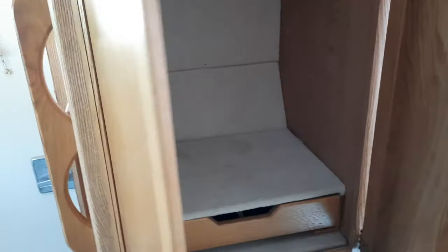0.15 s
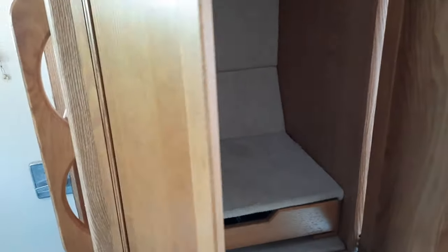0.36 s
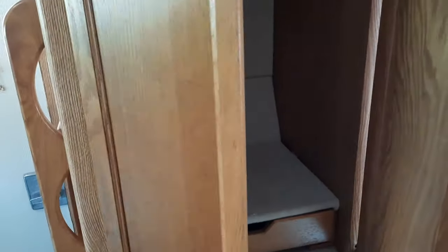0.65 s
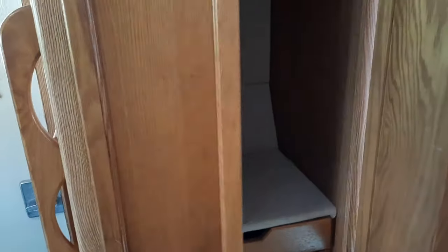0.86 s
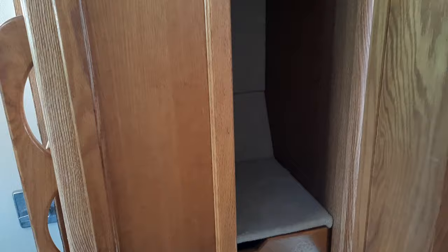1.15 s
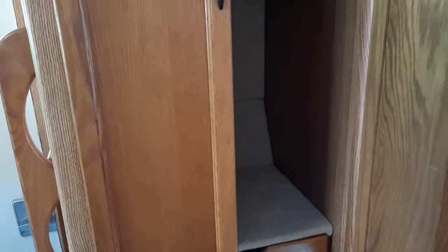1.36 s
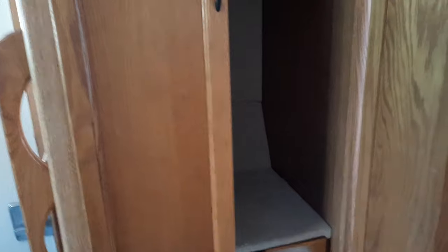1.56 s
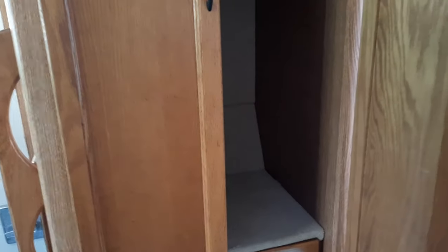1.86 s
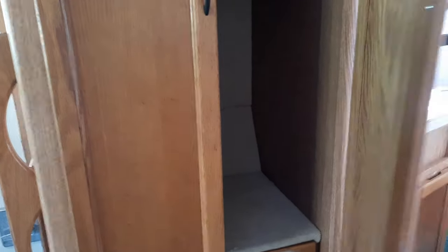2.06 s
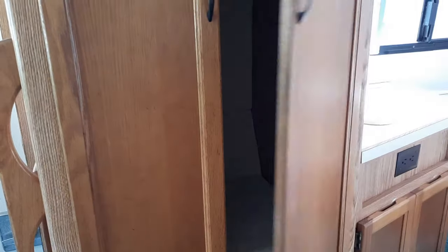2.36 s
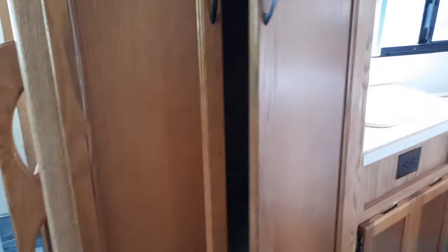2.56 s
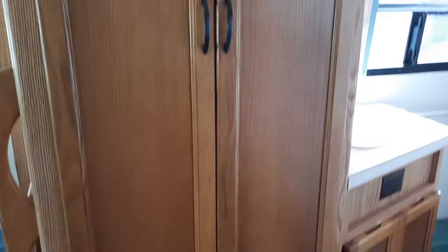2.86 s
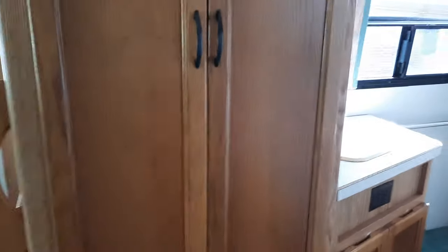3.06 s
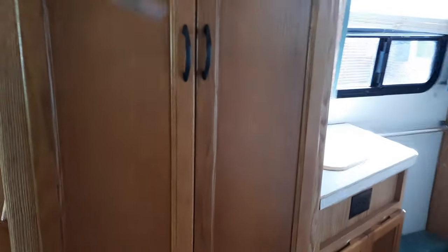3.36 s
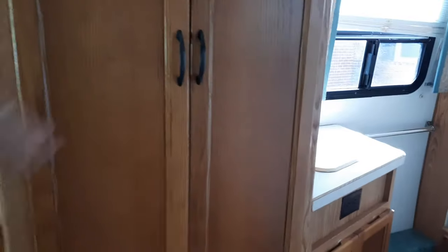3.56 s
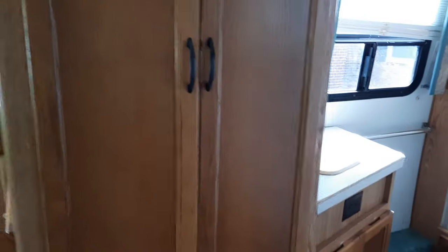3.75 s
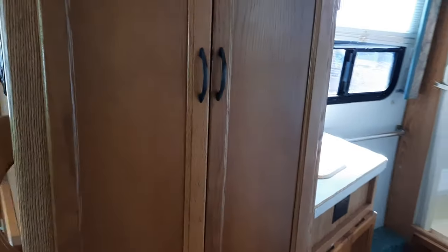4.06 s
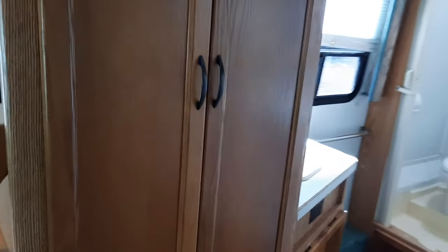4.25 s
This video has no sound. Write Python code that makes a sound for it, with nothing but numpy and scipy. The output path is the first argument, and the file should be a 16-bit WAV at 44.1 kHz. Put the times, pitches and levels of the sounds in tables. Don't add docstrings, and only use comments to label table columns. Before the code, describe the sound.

Close hand-held microphone, dry small vehicle interior. The left cupboard door closes near one second, bouncing on its catch as a loose wooden clatter with hollow boom. About two seconds later the right door rubs its edge, then lands flat with one sharp crack and short boomy bounces. Faint scuffs, ticks, dull bumps, low cabin rumble and thin hiss lie underneath.

```python
import sys
import numpy as np
from scipy import signal
from scipy.fft import rfft, irfft
from scipy.io import wavfile
from scipy.ndimage import uniform_filter1d

SR = 44100
rng = np.random.default_rng(int(sys.argv[2]) if len(sys.argv) > 2 else 0)


def to_linear_factor(level_db):
    exponent = np.asarray(level_db, float) / 20
    return 10 ** exponent


def log_audio(samples):
    frames = np.atleast_2d(samples).T
    limited = np.clip(frames, -1, 1)
    pcm = np.round(limited * 32767).astype(np.int16)
    wavfile.write(sys.argv[1], SR, pcm)


N = 194511

# [t/s, catch click level/dB, wood knock level/dB, panel boom level/dB]
LEFT_CONTACTS = [(0.9001, -27.5, -31, -26.5), (0.9040, -25.5, -31, -24), (0.9075, -26.5, -25, -27),
                 (0.9175, -12.5, -25, -19), (0.9241, -18.5, -16, -23), (0.9310, -20.5, -22.5, -20.5),
                 (0.9420, -18, -16, -24), (0.9730, -15, -20, -19), (1.0219, -19.5, -20.5, -23.5),
                 (1.0650, -18, -21.5, -19), (1.1069, -27, -30, -24.5)]
RIGHT_CONTACTS = [
    (2.9777, -14, -17, -17),
    (2.9825, -45, -18, -19.5),
    (2.9897, -25.5, -18.5, -25),
    (2.9964, -21.5, -25, -22.5),
    (3.0085, -25, -28, -19.5),
    (3.0476, -30.5, -24.5, -31.5),
    (3.0560, -32, -26.5, -24),
    (3.0760, -42, -35.5, -26.5),
]
# [t/s, catch click level/dB, wood knock level/dB, panel boom level/dB]
LEFT_SETTLING = [
    (1.1449, -58, -42, -36),
]
RIGHT_SETTLING = [
    (3.1040, -56, -36, -31),
    (3.1085, -60, -35, -32),
    (3.1555, -66, -43, -36),
    (3.1625, -70, -41, -37),
]
# [t/s, catch click level/dB, wood knock level/dB, panel boom level/dB]
BRUSH_CONTACTS = [
    (2.8685, -32.5, -41, -38.5),
    (2.8716, -36, -36.5, -26),
    (2.8748, -41, -34.5, -30.5),
    (2.9262, -50, -46, -33),
]
# [f/Hz, level/dB, t60/s]
LEFT_PANEL = [(57.7, -20.5, 0.32), (91, -7.5, 0.051), (118.3, -6, 0.16), (159.4, 0.5, 0.12),
              (204, -5.5, 0.3), (250, -5.5, 0.09), (276.4, -10.5, 0.25), (315.9, 2.5, 0.14),
              (355, -12.5, 0.14), (413, -9, 0.16), (477, -2, 0.048)]
RIGHT_PANEL = [(59.6, -5.5, 0.43), (80.06, -8, 0.42), (91.4, -2.5, 0.22), (120.2, 2, 0.18),
               (150, 5.5, 0.067), (173.6, -8.5, 0.2), (201.3, -14.5, 0.2), (276.3, -3.5, 0.21),
               (326.5, 2.5, 0.14), (359, -3.5, 0.14), (461, -3.5, 0.12), (508.8, -3, 0.11)]
BRUSHED_PANEL = [(62.9, -8, 0.17), (99.35, -14, 0.5), (139.1, -17, 0.14), (182, -16.5, 1), (220, -10, 0.15),
                 (282.8, -14.5, .2), (300.3, -2, 0.24), (314.6, 2.5, 0.13), (430, -11.5, 0.14),
                 (427, -27, 0.23)]
# [f/Hz, level/dB, t60/s]
LEFT_WOOD = [(530, 9, 0.011), (683, -4, 0.064), (716, -5, 0.08), (918, 6.5, 0.019), (1012, -11.5, 0.07),
             (1210, -6.5, 0.039), (1290, -2, 0.016), (1375, -5.5, 0.046), (1660, -18.5, 0.059),
             (1670, 0.5, 0.011)]
RIGHT_WOOD = [(523, -1.5, 0.027), (615, -5.5, 0.07), (758.5, 8, 0.042), (872, -10.5, 0.096),
              (971, -7.5, 0.08), (1060, -8, 0.018), (1188, -4, 0.06), (1323.4, -7.5, .06),
              (1584, -13.5, 0.11), (1885, -5.5, 0.063), (2264, -6.5, 0.04), (2950, -11, 0.064)]
# [f/Hz, level/dB, t60/s]
LEFT_CATCH = [(1980, -1.5, 0.006), (3100, 1.5, 0.01), (3700, -7, 0.009), (4350, -0.5, 0.008),
              (5020, -1.5, .008), (6330, -3.5, 0.011), (7600, -11.5, 0.0072)]
RIGHT_CATCH = [(2110, 0.5, 0.0028), (2850, 7, 0.0029), (3800, -2, 0.007), (4750, -5.5, 0.0068),
               (5140, -8.5, 0.008), (5950, -13, 0.022), (6800, -5, 0.0087)]
# [f/Hz, level/dB, t60/s]
HANDLE_MODES = [(1540, 0, 1.1), (2810, 5, .4)]
# [t/s, peak level/dB, length/s]
AIR_PUFF = (2.9904, -3, 0.0011)
# [f/Hz, level/dB per Hz]
CLATTER_COLOUR = [(590, -25), (1000, -9), (1820, -12), (2270, -4.5), (2750, -11), (5840, -17.5),
                  (7800, -24.5), (11700, -52.5)]
# [f/Hz, level/dB per Hz]
FIZZ_COLOUR = [(6000, -30.5), (7600, -10), (9900, -8.5), (11300, -7), (14000, -4.5), (15500, -3.5),
               (15900, -24.5), (16600, -48.5)]
# [t/s, peak level/dB, f/Hz, t60/s]
BUMPS = [(.028, -59, 326.5, 0.091), (0.591, -56, 332, 0.14), (.632, -66.5, 1440, 0.13),
         (.634, -74, 2310, 0.091), (0.663, -58, 320, 0.18), (.745, -49.5, 330.5, 0.11),
         (3.573, -52, 154, .08), (3.626, -47.5, 140, 0.086), (3.763, -45.5, 122, 0.11),
         (4.117, -54.5, 299, 0.11), (.828, -48.5, 295, .16)]
# [t/s, peak level/dB, t60/s, left minus right/dB]
SMALL_TICKS = [
    (1.434, -42.5, 0.01, 3),
               (.1364, -70, .012, 3), (.6315, -71, .03, -2), (1.5050, -70, .012, 0), (3.2880, -73, .012, 0),
               (3.4820, -72, .012, 0), (3.4754, -67, .012, 0), (3.6204, -68, .012, 0),
               (4.2684, -70, .008, 0)]
# [f/Hz, level/dB per Hz]
TICK_COLOUR = [(700, -45), (1300, -22), (2150, -12), (2700, -14.5), (3400, -13), (6330, -15.5),
               (12100, -21.5), (16000, -40)]
# [start t/s, length/s, level/dB, left minus right/dB]
SCUFFS = [(.63, .06, -71, 0), (3.645, .1, -62, 0), (3.99, .09, -65, 0), (4.395, .03, -70, 0),
          (1.36, .05, -69, 0)]
# [f/Hz, level/dB per Hz]
SCUFF_COLOUR = [(600, -20), (900, 0), (1900, -5), (3000, -7), (5000, -12), (8000, -18), (10000, -40)]
# [t/s, level/dB]
SWAY = [
    [(0.0, -55), (0.2, -62), (0.332, -65.5), (0.42, -59), (0.546, -64.5), (0.672, -50.5), (0.8, -54.5),
     (0.88, -56.5)],
    [(1.28, -46), (1.45, -53), (1.648, -63), (1.76, -57), (2.0, -61.5), (2.15, -62), (2.304, -69),
     (2.55, -68), (2.82, -74.5)],
    [(3.3, -52.5), (3.5, -55), (3.65, -50), (3.85, -55.5), (4.0, -59.5), (4.164, -54.5), (4.25, -57.5),
     (4.41, -53)],
]
# [f/Hz, level/dB per Hz]
RUMBLE_COLOUR = [(15, -61.5), (35, -22), (46, -10), (115, -4), (238, -15.5), (420, -20), (883, -38),
                 (2600, -55)]
# [f/Hz, width/Hz, lift/dB]
AIR_MODES = [(314, 48, 10), (482, 15, 3)]
# [f/Hz, level/dB per Hz]
HISS_COLOUR = [(710, -30), (1200, -9), (3000, -12), (5600, -10), (8000, -6), (9540, -8), (15400, -8),
               (16000, -25)]
# [f/Hz, t60/s]
CABIN_DECAY = [(300, .2), (1000, .16), (3000, .12), (5500, .085), (8000, .075), (14000, .08)]
# [f/Hz, likeness 0..1]
EAR_LIKENESS = [(60, .99), (250, .95), (600, .8), (1500, .3), (4000, 0)]


def closet_doors():
    left = door(LEFT_CONTACTS + LEFT_SETTLING, LEFT_PANEL, LEFT_WOOD, LEFT_CATCH, fizz_db=-6.5, thump_top_db=-24.5)
    pull = ring(HANDLE_MODES, rise=5.0, spread_db=-1, detune=0.009, apart=0.44, count=7)
    add(left, LEFT_CONTACTS[-1][0], to_linear_factor(-61) * pull)
    brush = door(BRUSH_CONTACTS, BRUSHED_PANEL, RIGHT_WOOD, RIGHT_CATCH, fizz_db=1.0, thump_top_db=-35.0)
    right = door(RIGHT_CONTACTS + RIGHT_SETTLING, RIGHT_PANEL, RIGHT_WOOD, RIGHT_CATCH,
                 fizz_db=-11.5, thump_top_db=-23.0)
    add(right, AIR_PUFF[0], air_puff())
    return left + brush + right


def door(contacts, panel, wood, catch, fizz_db, thump_top_db):
    mix = np.zeros((2, N))
    dulling_db_per_s = 113
    for s, click_db, knock_db, boom_db in contacts:
        top_db = click_db + fizz_db - dulling_db_per_s * (s - contacts[0][0])
        boom = panel_boom(panel, boom_db, thump_top_db)
        knock = to_linear_factor(knock_db - 5.5) * ring(wood, rise=5.0, spread_db=2.5, detune=0.07, apart=0.99, count=4, size=8192)
        bright = catch_click(catch, click_db) + frame_clatter(click_db, knock_db) + click_fizz(top_db)
        add(mix, s, cabin(boom, wet_db=-7.5), pan_db=1.5)
        add(mix, s, cabin(knock, wet_db=1.0), pan_db=-0.3)
        add(mix, s, cabin(bright, wet_db=0.0))
    return mix


def panel_boom(panel, boom_db, thump_top_db):
    upper = [mode for mode in panel if mode[0] > 165]
    lower = [mode for mode in panel if mode[0] < 165]
    thump_db = min(boom_db - 4.5, thump_top_db)
    boom = ring(upper, rise=1.1, spread_db=2.03, detune=0.018, apart=1.3, scatter=0.1, size=14000)
    thump = ring(lower, rise=1.0, spread_db=6.0, detune=0.046, apart=1.5, scatter=0.066, size=14000)
    return to_linear_factor(boom_db) * boom + to_linear_factor(thump_db) * thump


def catch_click(catch, click_db):
    click = ring(catch, rise=2.5, spread_db=2.0, detune=0.069, apart=0.35, count=4, size=2048)
    return np.pad(to_linear_factor(click_db - 4.5) * click, ((0, 0), (0, 2048)))


def frame_clatter(click_db, knock_db):
    level_db = max(click_db - 3.5, knock_db - 17)
    return fading(level_db, t60=0.035, size=4096) * coloured(CLATTER_COLOUR, 4096, channels=2)


def click_fizz(top_db):
    return fading(top_db, t60=0.025, size=4096) * coloured(FIZZ_COLOUR, 4096, channels=2) * to_linear_factor([[0.9], [-0.9]])


def air_puff():
    _, db, length = AIR_PUFF
    pulse = np.pad(np.hanning(round(length * SR)), (0, 999))
    puff = signal.sosfilt(signal.butter(1, 90, "high", fs=SR, output="sos"), pulse)
    return to_linear_factor(db) * puff / puff.max()


def bumps():
    out = np.zeros((2, N))
    for s, db, hz, t60 in BUMPS:
        bump = ring([(hz, 0, t60)], rise=2.5, spread_db=2.5, detune=0.051, apart=1.0, count=2, size=8192)
        add(out, s, to_linear_factor(db) * bump)
    return out


def ticks():
    out = np.zeros((2, N))
    for s, db, t60, pan_db in SMALL_TICKS:
        snap = fading(db + 4, max(t60, 0.003), 2048) * coloured(TICK_COLOUR, 2048, channels=2)
        add(out, s, cabin(snap, wet_db=-7), np.clip(pan_db, -6, 6))
    return out


def scuffs():
    out = np.zeros((2, N))
    for s, length, db, pan_db in SCUFFS:
        size = round(length * SR)
        grain = to_linear_factor(2.2 * evened(uniform_filter1d(rng.standard_normal(8192), 70)))
        rub = (grain * coloured(SCUFF_COLOUR, 8192, channels=2))[:, :size] * np.hanning(size)
        add(out, s, to_linear_factor(db) * cabin(rub, wet_db=-3), pan_db)
    return out


def rumble():
    frames, hz = N // 256 + 9, np.fft.rfftfreq(2048, 1 / SR)[:, None]
    a, b, c, d, patches = rng.standard_normal((frames, 1025, 5)).T
    patches = evened(uniform_filter1d(uniform_filter1d(patches, 5, 0), 8, 1))
    s, sway_db = np.concatenate(SWAY).T
    sway_db = np.interp(np.arange(frames) * 256 / SR, s, sway_db - sway_db.mean())
    same, left = np.clip(read(EAR_LIKENESS, hz), -1, 1), a + 1j * b
    z = np.array([left, same * left + np.sqrt(1 - same ** 2) * (c + 1j * d)])
    lift_db = sum(db * np.exp(-((hz - mode_hz) / width) ** 2) for mode_hz, width, db in AIR_MODES)
    z *= to_linear_factor(read(RUMBLE_COLOUR, hz) + lift_db + 1.5 * patches) * (hz < RUMBLE_COLOUR[-1][0])
    still = signal.istft(z, nperseg=2048, noverlap=1792)[1].std()
    follow = np.where(hz > 200, 1.1, 0.49)
    z *= np.hypot(to_linear_factor(follow * sway_db), to_linear_factor(-10))
    return to_linear_factor(-56.5) / still * signal.istft(z, nperseg=2048, noverlap=1792)[1][:, :N]


def hiss():
    return to_linear_factor(-82) * coloured(HISS_COLOUR, N, channels=2)


def cabin(x, wet_db):
    taps = np.zeros((2, SR // 5))
    at = np.arange(40, SR // 5 - 20, 10) + rng.integers(0, 10, (2, (SR // 5 - 51) // 10))
    np.put_along_axis(taps, at, rng.choice([-1., 1.], at.shape), 1)
    hz, t, z = signal.stft(taps, SR, nperseg=256)
    same = np.clip(read(EAR_LIKENESS, hz), 0, 1)[:, None]
    z[1] = same * z[0] + np.sqrt(1 - same ** 2) * z[1]
    tail = signal.istft(z * to_linear_factor(-60 * t / read(CABIN_DECAY, hz)[:, None]), SR, nperseg=256)[1]
    tail *= to_linear_factor(wet_db) / np.linalg.norm(tail[0])
    tail[:, 0] = 1
    return signal.fftconvolve(x, tail, axes=1)


def ring(modes, rise, spread_db, detune, apart, scatter=1, count=1, size=22050):
    t = np.arange(size) / SR
    hz, db, t60 = np.repeat(modes, count, axis=0).T[:, :, None]
    off, lift, phase, gap = rng.standard_normal((len(hz), 4)).T[:, :, None]
    turn = 2 * np.pi * (hz * (1 + detune * off) * t + scatter * phase)
    level = to_linear_factor(db + spread_db * lift - 60 * t / t60)
    level *= 1 - np.exp(-t * hz / rise)
    sound = np.array([(level * np.sin(turn + ear * apart * hz / 2000 * gap)).sum(0) for ear in (1, -1)])
    return sound / np.sqrt(uniform_filter1d((sound ** 2).mean(0), 441).max())


def coloured(points, size, channels=1):
    hz = np.fft.rfftfreq(size, 1 / SR)
    inside = (hz >= points[0][0]) & (hz <= points[-1][0])
    white = rfft(rng.standard_normal((channels, size)))
    return evened(irfft(white * to_linear_factor(read(points, hz)) * inside, size))


def fading(db, t60, size):
    return to_linear_factor(db - 60 * np.arange(size) / SR / t60)


def evened(x):
    return x / np.sqrt(np.mean(x ** 2) + 1e-20)


def read(points, hz):
    f, value = np.transpose(points)
    return np.interp(np.log(hz + 1), np.log(f + 1), value)


def add(mix, s, sound, pan_db=0):
    part = mix[:, round(s * SR):][:, :sound.shape[-1]]
    part += sound[..., :part.shape[1]] * to_linear_factor(np.array([[pan_db], [-pan_db]]) / 2)


def scene():
    return closet_doors() + bumps() + ticks() + scuffs() + rumble() + hiss()


def low_pass(x):
    return signal.sosfilt(signal.butter(12, 16830, fs=SR, output="sos"), x)


def record(dry):
    thinned = signal.sosfilt(signal.butter(2, 46.42, "high", fs=SR, output="sos"), dry)
    top_cut = signal.firwin(255, 16500, window=("kaiser", 9), fs=SR)
    thinned = signal.oaconvolve(thinned, top_cut[None], "same")
    return low_pass(np.clip(thinned, -1, 1))


dry = scene()
out = record(dry)
log_audio(out)
```